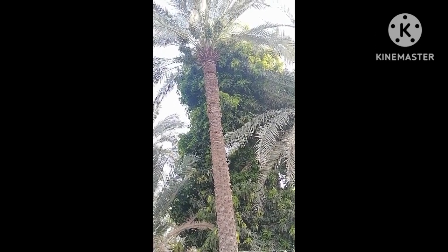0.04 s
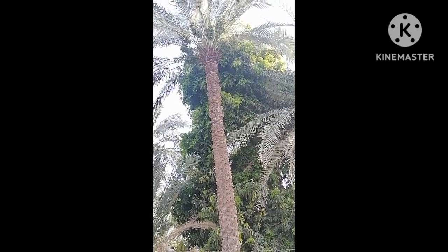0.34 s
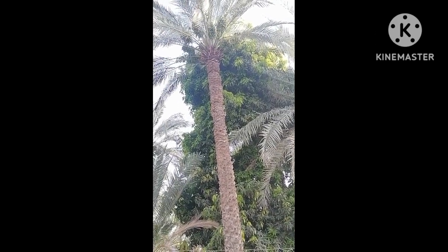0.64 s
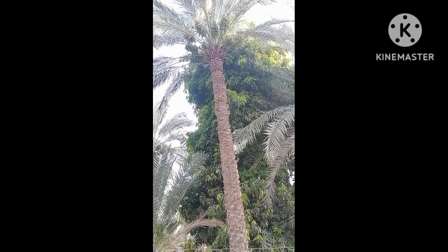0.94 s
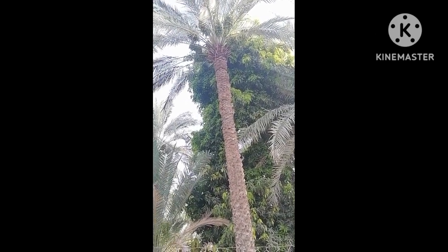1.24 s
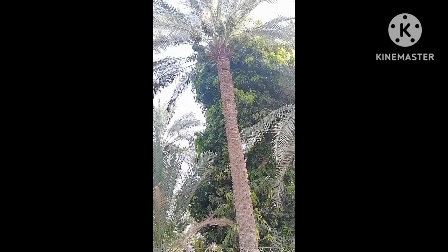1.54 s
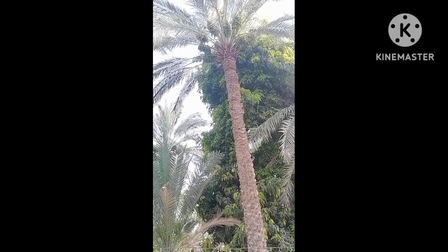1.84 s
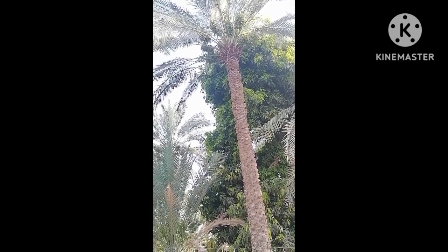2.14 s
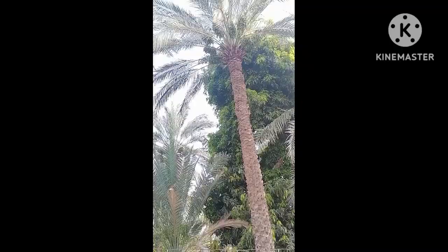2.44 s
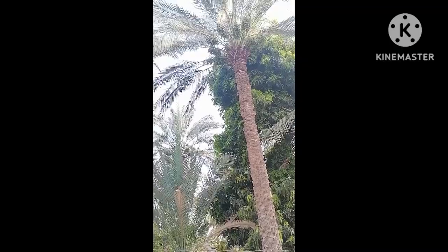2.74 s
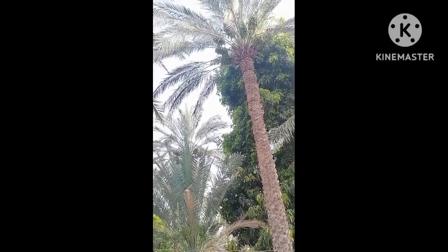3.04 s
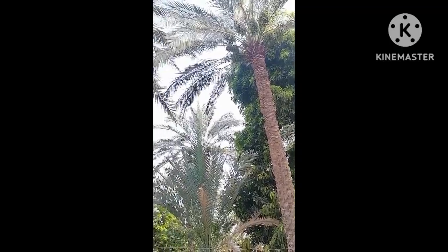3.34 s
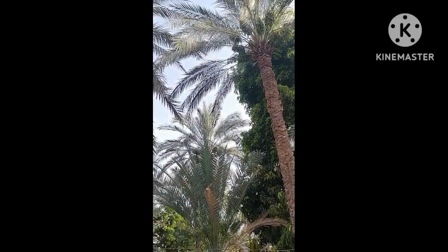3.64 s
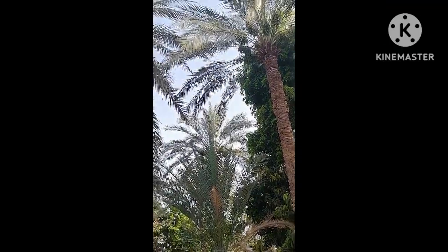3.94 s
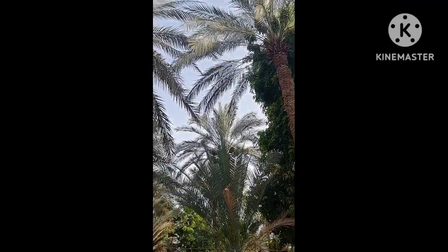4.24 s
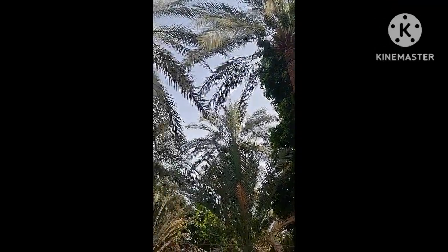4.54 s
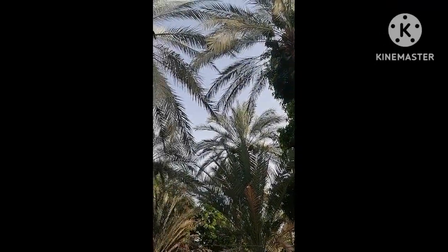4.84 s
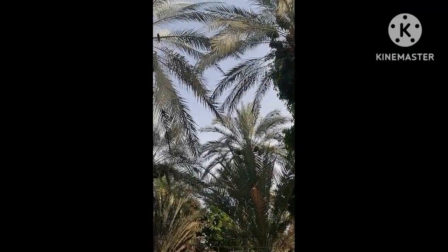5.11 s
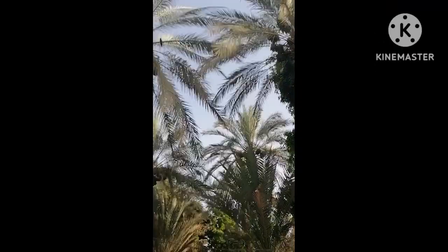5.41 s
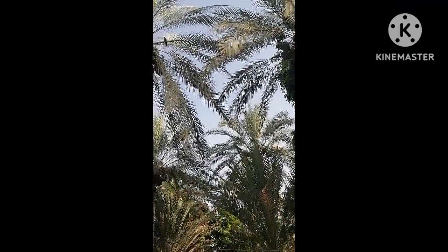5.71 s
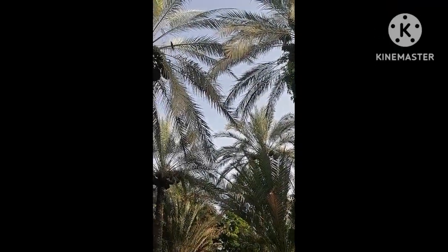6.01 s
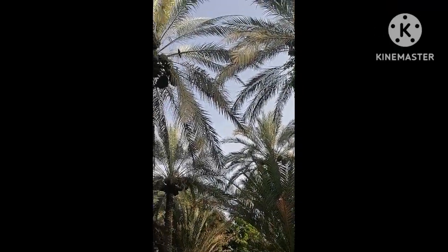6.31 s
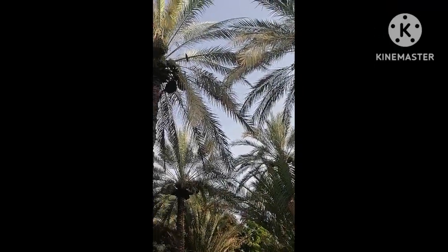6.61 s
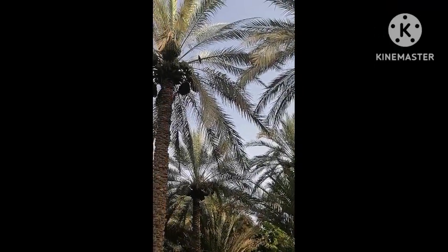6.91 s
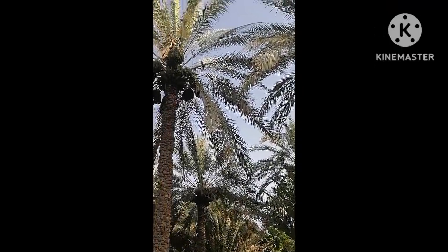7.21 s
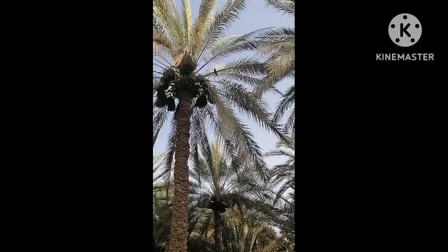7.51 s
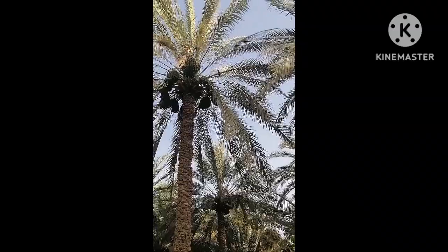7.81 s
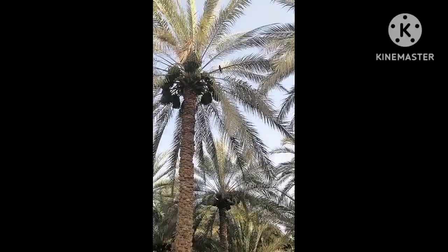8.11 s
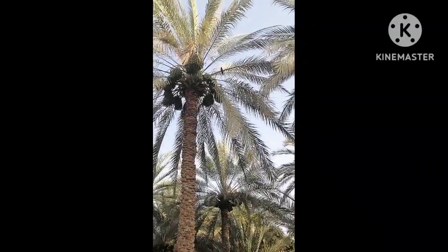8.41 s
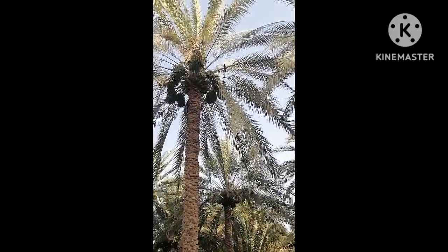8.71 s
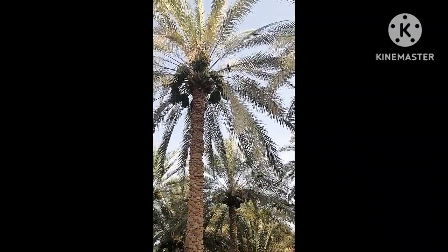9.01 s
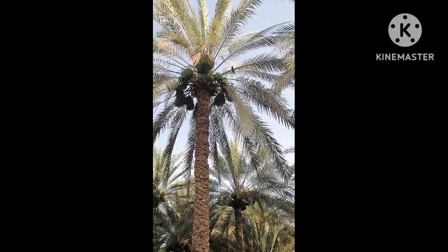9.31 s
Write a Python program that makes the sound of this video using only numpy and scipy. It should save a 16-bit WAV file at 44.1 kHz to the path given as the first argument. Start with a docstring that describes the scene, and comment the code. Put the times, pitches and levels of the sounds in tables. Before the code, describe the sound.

In a palm grove, a nearby songbird gives a sliding note and short clear whistles, mostly from the right, then switches to stuttering nasal calls. Other small birds peep and rasp in the treetops. In the second half a crow caws three times, and the songbird stutters once more at the end. A distant flock, faint leaf hiss and a low engine rumble continue underneath.

```python
"""Birds in a palm grove. A near songbird opens with a sliding note and clear whistles. After a second
it yelps, and other birds peep and rasp in the treetops. From 2.5 s it stutters nasal notes, its voice
box opening in quick pulses. The rasps crowd together after 4 s. From about 6 s a crow caws three times
with a buzzing voice, and the songbird has the last stutter. All along, trunks and palm leaves scatter
the calls, a far flock chirps, leaves hiss and a far engine drones underneath."""
import sys
import numpy as np
from scipy import signal
from scipy.fft import rfft, irfft
from scipy.io import wavfile
from scipy.ndimage import uniform_filter1d, map_coordinates

SR = 44100
rng = np.random.default_rng(int(sys.argv[2]) if len(sys.argv) > 2 else 0)


def digitize_waveform(pressure):
    """Quantize a signal to 16-bit integers and store it at the path in sys.argv[1].

    Rows of a 2-D input are taken as channels; values are limited to [-1, 1].
    """
    field = np.atleast_2d(pressure).T
    bounded = np.clip(field, -1, 1)
    quanta = np.round(bounded * 32767).astype(np.int16)
    wavfile.write(sys.argv[1], SR, quanta)


N = 421155

# A harmonic is a whole multiple of a pitch. lean_db is left minus right. Roughness 0 is a clean tone.
# Rising, rough yelps: start_s, length_s, pitch_hz, level_db
YELPS = [(1.073, 0.06, 1503, -41), (2.33, .056, 1507, -39), (6.94, 0.049, 1395, -41.5),
         (9.113, 0.05, 1412, -39.5)]
# Stuttering nasal notes: start_s, length_s, pitch_hz, level_db
STUTTERS = [(2.483, 0.056, 1394, -37.5), (2.616, 0.1078, 1404, -37), (2.799, 0.077, 1352, -47.5),
            (3.648, 0.03, 1370, -40.5), (3.755, 0.079, 1354, -40), (3.907, .14, 1343, -38),
            (5.029, 0.045, 1358, -49), (5.138, 0.08, 1369, -38), (5.292, 0.16, 1356, -40),
            (7.098, 0.034, 1362, -40.5), (7.208, 0.085, 1364, -39), (7.364, 0.12, 1341, -40.5),
            (9.263, 0.041, 1361, -38.5), (9.377, 0.085, 1359, -37.5)]
# A nasal note's harmonics above the second: multiple, left_db, right_db
NASAL_OVERTONES = [(3, -6, -16), (4, -20, -2), (5, -8, -13), (6, 1.5, -30.5)]
# How nasal notes shift between the sides: time_s, second_left_db, second_right_db, overtones_left_db
NASAL_BALANCE = [(1.1, -14, -0.5, -19), (2.6, -14.5, -1, -15), (3.9, -17, -3, -28), (5.3, -11, -3, -22.5),
                 (7.1, -10.5, -13.5, -20), (9.3, -13.5, -7, -15.5)]
# Held whistles: start_s, held_length_s, pitch_hz, level_db, lean_db
WHISTLES = [(0.156, 0.059, 2618, -43, -20), (0.402, .02, 2987, -46, -16.5),
            (0.581, 0.052, 2625, -42, -19.5), (0.848, 0.012, 3000, -41.5, -15),
            (1.022, 0.059, 2625, -43.5, -21.5), (1.307, 0.025, 2850, -44.5, -10.5),
            (1.506, .07, 2600, -46.5, -21), (1.608, 0.025, 2636, -49, -31.5), (8.186, 0.051, 2705, -52, -4)]
# Sliding notes: start_s, length_s, low_pitch_hz, level_db, lean_db
SLIDES = [(0, 0.082, 2352, -41, -9), (2.865, 0.1, 2374, -38.5, -7), (3.292, 0.11, 2350, -63, -11),
          (3.558, 0.13, 2326, -65, -11), (4.163, .135, 2254, -42, -10), (5.563, 0.13, 2245, -42, -11)]
# The course of one slide: share_of_length, pitch_ratio, effort_db, roughness
SLIDE_SHAPE = [(0, 1.22, -10, 0.5), (.35, 1.07, -4.5, 0.37), (.5, 1.01, -1, 0.1), (.71, .99, 2, 0),
               (.75, 1.2, -14, 0.33), (.9, 1.47, -13.5, 0.34), (1, 1.37, -22, .3)]
# The crow's caws: start_s, length_s, pitch_hz, level_db
CAWS = [(5.943, 0.26, 480, -38), (6.642, 0.27, 477.6, -37), (7.373, 0.275, 480.2, -37)]
# The course of one caw: share_of_length, pitch_ratio, effort_db, flutter_amount, roughness
CAW_SHAPE = [(0, .85, -18.5, 0.29, 1.04), (.1, .945, -2.5, 0.26, 0.4), (.19, .995, 3.5, 0.2, 0.07),
             (.42, 1.005, 2, 0.63, 0.3), (.62, 1.003, 1, 0.88, 0.1), (.83, .99, -0.5, 1.2, 0.88),
             (.92, .94, -4, 0.9, 0.91), (1, 0.82, -18.5, 0.48, 0.3)]
# How the crow's throat colours its voice: frequency_hz, left_db, right_db
CROW_THROAT = [(456, -49, -41), (924, -14.5, -15.5), (1480, -4.5, 2.5), (1950, -8.5, 1), (2500, -29, -15.5),
               (2930, -21, -27), (3320, -21, -11.5), (4380, -41, -37), (5440, -34, -22.5),
               (6460, -19, -7.5), (7470, -26.5, -31), (9000, -14, -23.5), (10550, -42, -37),
               (12100, -32, -32.5), (14000, -56, -58)]
# Harsh rasps: start_s, length_s, pitch_hz, level_db, lean_db, octave_db
RASPS = [(1.578, 0.079, 5480, -53.5, -12, -18.5), (3.082, 0.11, 5300, -58, -13.5, -36),
         (4.162, 0.16, 5670, -50.5, -1.5, -15), (4.311, 0.24, 5685, -51, 1.5, -14.5),
         (4.458, 0.15, 5640, -49, -2.5, -21.5), (4.56, 0.27, 6180, -54.5, -4, -16.5),
         (4.976, 0.12, 5870, -48.5, -3, -17.5), (5.463, 0.13, 5520, -52, -4, -24),
         (6.396, 0.095, 5460, -47, -2.5, -24), (6.457, 0.18, 5930, -55.5, 3, -12),
         (7.698, 0.079, 5870, -53.5, -5, -13), (8.158, 0.093, 5780, -60, 3, -8.5),
         (8.6, 0.082, 5600, -45.5, -4, -18.5), (8.878, 0.07, 5360, -51, 1, -16)]
# Short high peeps: start_s, pitch_hz, level_db, lean_db
PEEPS = [(1.328, 6230, -43, -9.5), (1.365, 5750, -48, -8), (1.40, 5700, -51, -12), (1.432, 5550, -53, -10),
         (3.069, 5920, -46, -6), (8.264, 4750, -59, -18), (8.305, 4730, -58, -20), (8.758, 5730, -47, -4),
         (8.79, 5750, -43.5, -10.5), (8.842, 5700, -42, -10), (8.948, 6520, -54, -11)]
# Lower gliding calls: start_s, length_s, pitch_hz, glide_share, level_db, lean_db, roughness
GLIDES = [(0.949, .05, 2476, -0.064, -54, -20, 0.35), (1.41, .04, 1950, -.1, -57, -8.5, 0.4),
          (1.442, .022, 2640, 0.1, -45, -15, 0.6), (1.458, .025, 2340, -0.136, -44, -23.5, 0.32),
          (1.482, 0.0408, 1993, -.24, -46.5, -4.5, .55), (4.498, 0.075, 2500, -0.102, -59, -9.5, 0.58),
          (7.891, 0.12, 1745, -0.0045, -64.5, -11, 0.6), (7.927, 0.077, 3300, -.03, -55.5, -4, 0.88),
          (8.299, .13, 3256, -0.12, -55, -7.5, .9), (8.79, 0.077, 3190, .03, -55.5, -10, 0.63),
          (9.292, 0.086, 2963, -0.22, -49, -4, 0.65)]
# Loudness of the far flock: time_s, high_twitter_db, low_chatter_db
FLOCK_LEVELS = [(0, -62, -59), (.8, -61.5, -58), (2.1, -67, -76), (2.8, -63, -55), (3.4, -65.5, -71.5),
                (7.2, -72, -65), (7.8, -60.5, -56.5), (8.4, -58.5, -65.5), (9.55, -63.5, -64)]
# Tone colour of the rumble and leaf hiss: frequency_hz, relative_db
AIR_COLOUR = [(21, -33), (36, -0.5), (69, -7.5), (141, -11), (168, -14), (195, -13.5), (324, -21),
              (844, -18), (1090, -24), (2150, -27.5), (2980, -27.5), (4040, -34), (5200, -21.5),
              (7590, -36.5), (15000, -45.5)]
# How alike that noise is on both sides: frequency_hz, likeness (1 is the same)
AIR_LIKENESS = [(60, 0.96), (150, 0.8), (380, 0.73), (940, 0.089), (2350, -0.6), (5880, 0.046),
                (14700, -0.093)]
# Which side that noise favours: frequency_hz, lean_db
AIR_LEAN = [(60, 1), (120, -1.5), (240, -3.5), (470, 2), (940, -1), (1870, -5.0), (3720, -6.5), (7390, 1.5),
            (14700, 0)]
# The engine's tones: multiple_of_firing_rate, relative_db
ENGINE_TONES = [(1, -0.5), (2, -13), (3, -22), (4.5, -21)]
# Chance swells and dips in the low rumble's loudness: time_s, strength_db
RUMBLE_SWELLS = [(0.0, -59.5), (0.7, -53), (1.0, -63), (1.45, -48), (2.05, -61), (2.7, -65.5),
                 (3.35, -51.5), (3.95, -60), (5.55, -56.5), (5.7, -69), (6.2, -59.5), (7.3, -57.5),
                 (7.45, -65.5), (7.9, -49), (8.05, -58.2), (8.2, -48.5), (8.65, -62.5), (9.5, -58.5)]


def nasal_notes():
    """The near songbird: yelps rise and are rough, stutters sag and pulse for most of their length."""
    out = np.zeros((2, N))
    for start, length, hz, level_db in YELPS:
        add(out, start, nasal_note(start, length, hz, level_db, 0.0066, glide=0.069, rough=0.57))
    for start, length, hz, level_db in STUTTERS:
        add(out, start, nasal_note(start, length, hz, level_db, 0.678 * length, glide=-0.0378, rough=.33))
    return out


def nasal_note(start, length, hz, level_db, pulsed_s, glide, rough, pulse_hz=81, lag_s=0.00028):
    """The voice box opens in short pulses, each with a small pitch bend, then holds the tone."""
    t, progress = clock(length)
    pulsing = np.clip((pulsed_s - t) / .012, 0, 1)
    beat = turn(pulse_hz * (1 + 0.011 * drift(55, len(t)))) + np.pi / 4
    closing = pulsing * (1 + np.cos(beat)) / 2
    arch = 4 * progress * (1 - progress)  # lifts pitch and loudness in mid-note
    contour = 1 + glide * (progress - .5) + 0.0191 * (arch - .5) - 0.0289 * closing
    shake = 0.053 * rough ** 2 * (.5 + 2 * progress) * drift(1300, len(t))
    phase = turn(hz * (contour + shake)) - 2 * np.pi * hz * np.array([[0], [lag_s]])
    weak_first_pulse_db = -4.5 * pulsing * (beat < 2 * np.pi)
    strength = (1 - closing) ** 0.87 * from_db(level_db + weak_first_pulse_db + 3.3 * arch - 1)
    left_db, right_db, overtones_left_db = read(NASAL_BALANCE, start)
    harmonics = [(2, left_db, right_db)]
    for k, left, right in NASAL_OVERTONES:
        # on the right, the third harmonic shares half of the second one's fading
        harmonics.append((k, left + overtones_left_db, right + (k == 3) * right_db / 2))
    tone = 0
    for k, left, right in harmonics:
        flicker_db = (1.53 + 2.8 * rough) * drift(155.5, len(t))
        tone += from_db(np.array([[left], [right]]) + flicker_db) * np.sin(k * phase)
    return np.sqrt(2) * tone * strength * fade(t, 0.0018, 0.0024)


def whistles(drop_s=.018, drop_from_hz=3480, drop_db=-15.5):
    """A weak, scratchy drop in pitch, scrambled by nearby leaves, settles on a clean held tone."""
    out = np.zeros((2, N))
    for start, length, hz, level_db, lean_db in WHISTLES:
        t, _ = clock(drop_s + length)
        still_to_fall = 1 / (1 + np.exp((t - .7 * drop_s) / 0.00375))
        dropping = np.clip((drop_s - t) / 0.0051 + .5, 0, 1)
        tone = pure_voice(hz + (drop_from_hz - hz) * still_to_fall, rough=.08 + 0.71 * dropping)
        tone *= from_db(level_db) * fade(t, 0.0046, .003) * pan(lean_db)
        add(out, start - drop_s, through_leaves(tone * (1 - dropping), hidden=0.12))
        add(out, start - drop_s, from_db(drop_db) * leaf_scatter(tone * dropping, spread_s=0.0043))
    return out


def slides():
    """One unbroken note clears and swells as it sinks, then flicks up at the end."""
    out = np.zeros((2, N))
    for start, length, hz, level_db, lean_db in SLIDES:
        t, progress = clock(length)
        ratio, effort_db, rough = read(SLIDE_SHAPE, progress)
        tone = pure_voice(hz * ratio, rough, octave_db=-24)
        tone *= from_db(level_db + effort_db) * fade(t, 0.002, .005) * pan(lean_db)
        add(out, start, through_leaves(tone, hidden=0.23))
    return out


def crow(hiss_db=-6, lag_s=0.00011, scatter_hz=2800):
    """A buzzing voice box flutters once every five cycles; the throat colours the sound."""
    out = np.zeros((2, N))
    for start, length, hz, level_db in CAWS:
        t, progress = clock(length)
        size = len(t)
        ratio, effort_db, flutter, rough = read(CAW_SHAPE, progress)
        phase = turn(hz * ratio * (1 + 0.041 * rough * drift(900, size) + 0.0031 * drift(55.2, size)))
        # the flutter loses step where the voice is hoarse
        flutter_phase = phase / 5 + 1.1 * rough * drift(110, size)
        # each swell is louder and a little higher in pitch
        swell = np.exp(0.3 * flutter * np.cos(flutter_phase))
        phase += 0.42 * flutter * np.sin(flutter_phase)
        buzz = rms_one(sum(np.cos(k * phase + rng.uniform(0, 2 * np.pi)) for k in range(1, 30)))
        hoarseness = from_db(-11) * (.5 + rough) * rng.standard_normal(size)
        hiss = rms_one(band(rng.standard_normal(size), (2300, 13000), order=3))
        source = (buzz + hoarseness) * swell + from_db(hiss_db) * hiss
        # long waves pass the leaves, short ones are scattered
        bins_hz = np.fft.rfftfreq(size, 1 / SR)
        direct = 1 / (1 + (bins_hz / scatter_hz) ** 4)
        scattered = leaf_scatter(source[None], spread_s=0.0064)[:, :size]
        heard = np.sqrt(direct) * rfft(source) + np.sqrt(1 - direct) * rfft(scattered)
        throat = from_db([at_hz(CROW_THROAT, bins_hz, column) for column in (1, 2)])
        right_delay = np.exp(-2j * np.pi * bins_hz * np.array([[0], [lag_s]]))
        voice = irfft(heard * throat * right_delay, size)
        voice /= np.sqrt(uniform_filter1d(np.mean(voice ** 2, axis=0), size=1400))  # even out the level
        add(out, start, voice * from_db(level_db + effort_db) * fade(t, 0.0017, 0.0028))
    return out


def rasps(shake=0.18, shake_hz=2600, grain_db=3, grain_hz=170, upper_band_hz=(8300, 11400)):
    """A wildly shaken tone and its octave ring in the beak as two harsh bands; leaves scramble them."""
    out = np.zeros((2, N))
    for start, length, hz, level_db, lean_db, octave_db in RASPS:
        t, _ = clock(length)
        phase = turn(hz * (1 + shake * drift(shake_hz, len(t))))
        bands = []
        for k, beak_hz in ((1, (0.84 * hz, 1.156 * hz)), (2, upper_band_hz)):
            scattered = leaf_scatter(np.sin(k * phase)[None], spread_s=0.0026)
            bands.append(rms_one(band(scattered, beak_hz, order=3)[:, :len(t)]))
        main, octave = bands
        hiss = rms_one(band(rng.standard_normal((2, len(t))), (4200, 11500), order=2))
        grain = from_db(grain_db * drift(grain_hz, len(t)))
        strength = rms_one(fade(t, 0.009 + length * 0.26, length * 0.35) * grain)
        voice = main + from_db(octave_db) * (octave + from_db(-2) * hiss)
        add(out, start, from_db(level_db) * pan(lean_db) * strength * voice)
    return out


def twitter(peep_s=0.0234):
    """High arched peeps and lower glides in the treetops; rougher glides come from deeper in the leaves."""
    out = np.zeros((2, N))
    for start, hz, level_db, lean_db in PEEPS:
        tone = chirp(peep_s, 0.97 * hz, hz, .87 * hz, rough=0.61)
        add(out, start, through_leaves(from_db(level_db) * pan(lean_db) * tone, hidden=0.63))
    for start, length, hz, glide, level_db, lean_db, rough in GLIDES:
        tone = chirp(length, hz * (1 - glide / 2), hz, hz * (1 + glide / 2), rough)
        add(out, start, through_leaves(from_db(level_db) * pan(lean_db) * tone, hidden=rough))
    return out


def chirp(length, start_hz, middle_hz, end_hz, rough):
    """A short note bent through three pitches; the rougher it is, the softer its edges."""
    t, progress = clock(length)
    curve = np.polyfit([0, .5, 1], [start_hz, middle_hz, end_hz], 2)
    strength = rms_one(fade(t, 0.0027 + 0.18 * rough * length, 0.002 + 0.12 * rough * length))
    return pure_voice(np.polyval(curve, progress), rough) * strength


def pure_voice(hz, rough, octave_db=-33, lag_s=0.00024):
    """A nearly pure tone that reaches the left side first; roughness shakes its pitch and strength."""
    shake = 0.061 * rough * drift(695.6, len(hz))
    phase = turn(hz * (1 + shake)) - 2 * np.pi * hz * np.array([[0], [lag_s]])
    strength = rms_one(from_db(6.5 * rough * drift(300, len(hz)) + 0.8 * drift(70, len(hz))))
    return np.sqrt(2) * strength * (np.sin(phase) + from_db(octave_db) * np.sin(2 * phase))


def through_leaves(tone, hidden):
    """Part of a call comes straight, the hidden part by way of the leaves."""
    out = hidden * leaf_scatter(tone, spread_s=0.038)
    add(out, 0, np.sqrt(1 - hidden ** 2) * tone)
    return out


def leaf_scatter(sound, spread_s):
    """Leaves close to a bird split its call into many paths of slightly different length."""
    t = np.arange(3000) / SR
    paths = rng.standard_normal((2, len(t))) * np.exp(-t / spread_s)
    paths /= np.sqrt(np.sum(paths ** 2, axis=1, keepdims=True))
    return signal.fftconvolve(sound, paths, axes=1)


def grove_echoes(sound, decay_s, build_s):
    """Trunks and leaves return a spray of faint echoes, different at each side."""
    t = np.arange(SR) / SR
    echoes = rng.standard_normal((2, SR)) * (rng.random((2, SR)) < .05)
    echoes *= from_db(-60 * t / decay_s) * np.clip(t / build_s, 0, 1)
    echoes /= np.sqrt(np.sum(echoes ** 2, axis=1, keepdims=True))
    sides_mixed = sound + 0.29 * sound[::-1]
    return signal.fftconvolve(sides_mixed, echoes, axes=1)[:, :N]


def flock(per_s, centre_hz, spread, lean_db):
    """Many far birds chirp at random, each on its own pitch and slope, heard mostly as echoes."""
    out = np.zeros((2, N))
    birds = rng.uniform(-1.1, 1, (int(per_s * N / SR), 6))
    for k, (when, pitch, slope, span, loudness, place) in enumerate(birds):
        hz = centre_hz * np.exp(spread * pitch)
        length = .035 * np.exp(.5 * span)
        tone = chirp(length, hz * (1 + 0.0824 * slope), hz * 1.02, hz * (1 - 0.1 * slope), rough=0.316)
        add(out, (k + when) / per_s, tone * from_db(5 * loudness) * pan(lean_db + 4 * place))
    return rms_one(0.14 * out + grove_echoes(out, decay_s=0.48, build_s=0.0049))


def engine(firing_hz=66.6, waver=0.03496, swell_db=3.0, gain_db=-3.5):
    """The lowest tones of a far engine arrive as a rumble that swells and wavers by chance."""
    phase = turn(firing_hz * (1 + waver * drift(14, N)))
    strength = from_db(gain_db + read(RUMBLE_SWELLS, np.arange(N) / SR)[0])
    drone = 0
    for k, level_db in ENGINE_TONES:
        swell = from_db(swell_db * drift(9.8, N))
        drone += from_db(level_db) * rms_one(np.sin(k * phase) * swell)
    return pan(-6.0) * strength * drone


def air(level_db=-56.5):
    """Distant rumble and leaf hiss, alike at both sides in the bass."""
    hz = np.fft.rfftfreq(N, 1 / SR)
    shared, opposed = rfft(rng.standard_normal((2, N)))
    alike = np.clip(at_hz(AIR_LIKENESS, hz), -.4, 1)
    side = np.array([[1], [-1]])
    noise = np.sqrt(1 + alike) * shared + side * np.sqrt(1 - alike) * opposed
    colour = from_db(at_hz(AIR_COLOUR, hz) + side * at_hz(AIR_LEAN, hz) / 2)
    return from_db(level_db) * rms_one(irfft(noise * colour, N))


def from_db(db):
    """Turns decibels into a multiplier."""
    return 10 ** (np.asarray(db) / 20)


def rms_one(x):
    """Scales a sound to an average power of 1."""
    return x / np.sqrt(np.mean(x ** 2) + 1e-20)


def read(rows, at):
    """Reads a table between its rows, looking up by the first column."""
    places, *columns = np.transpose(rows)
    return [np.interp(at, places, column) for column in columns]


def at_hz(rows, hz, column=1):
    """Reads one column of a frequency table, with octaves evenly spaced."""
    rows = np.array(rows)
    return np.interp(np.log(hz + 1), np.log(rows[:, 0]), rows[:, column])


def drift(rate, size):
    """A random wander, roughly 1 in size, that changes about rate times a second."""
    at = np.arange(size) * rate / SR
    return map_coordinates(rng.standard_normal(int(at[-1]) + 4), [at + 1], order=1) / np.sqrt(2 / 3)


def turn(hz):
    """The phase of a changing pitch: how far its wave has turned."""
    return 2 * np.pi * np.cumsum(hz) / SR


def clock(length):
    """Seconds into a note, and the share of it that has passed."""
    t = np.arange(int(length * SR)) / SR
    return t, t / t[-1]


def fade(t, attack_s, release_s):
    """Rounded opening and closing of a note."""
    opening = np.sin(np.pi / 2 * np.clip(t / attack_s, 0, 1))
    closing = np.sin(np.pi / 2 * np.clip((t[-1] - t) / release_s, 0, 1))
    return opening * closing


def band(x, edges_hz, order):
    """Keeps the frequencies between two edges."""
    return signal.sosfilt(signal.butter(order, edges_hz, "band", fs=SR, output="sos"), x)


def pan(lean_db):
    """Left and right multipliers; a positive lean favours the left."""
    return from_db(np.array([[lean_db], [-lean_db]]) / 2)


def add(out, start_s, sound):
    """Mixes a stereo sound in at the given time."""
    i = max(int(start_s * SR), 0)
    out[:, i:i + sound.shape[1]] += sound[:, :max(N - i, 0)]


def scene():
    """Near birds and their echoes over the far flock, the air and the engine."""
    high_db, low_db = read(FLOCK_LEVELS, np.arange(N) / SR)
    far = from_db(high_db) * flock(per_s=36, centre_hz=5700, spread=0.21, lean_db=-9.5)
    far += from_db(low_db) * flock(per_s=22, centre_hz=2698, spread=0.16, lean_db=-5.0)
    nasal = nasal_notes()
    clear = whistles() + slides() + twitter()
    harsh = rasps()
    caws = crow()
    echoing = from_db(-7.5) * nasal + from_db(-9.5) * clear + from_db(-6.5) * harsh
    echoes = grove_echoes(echoing, decay_s=0.46, build_s=0.0047)
    echoes += from_db(-10.5) * grove_echoes(caws, decay_s=0.31, build_s=0.011)
    return nasal + clear + harsh + caws + echoes + far + air() + engine()


def record(dry):
    """The highest treble, above 15200 Hz, is cut steeply."""
    return signal.sosfilt(signal.ellip(12, .1, 80, 15200, fs=SR, output="sos"), dry)


dry = scene()
out = record(dry)
digitize_waveform(out)
```